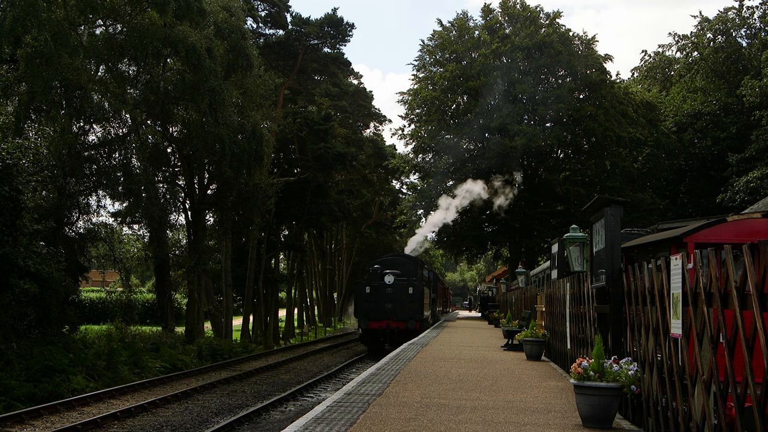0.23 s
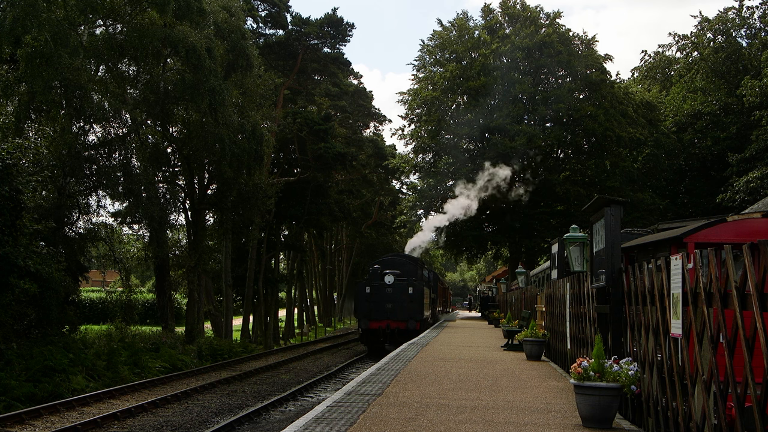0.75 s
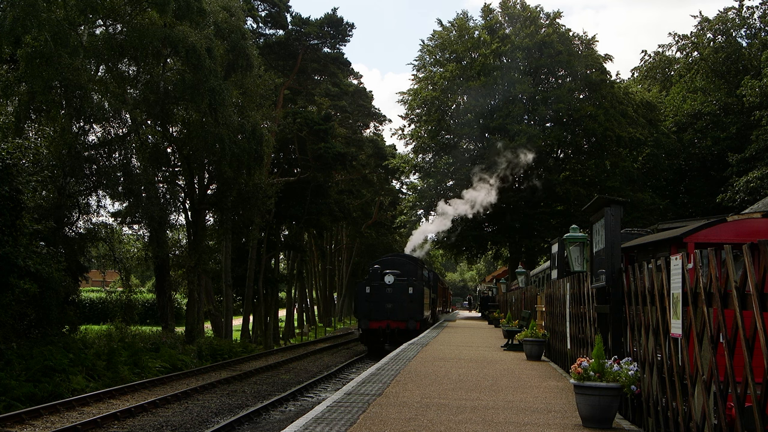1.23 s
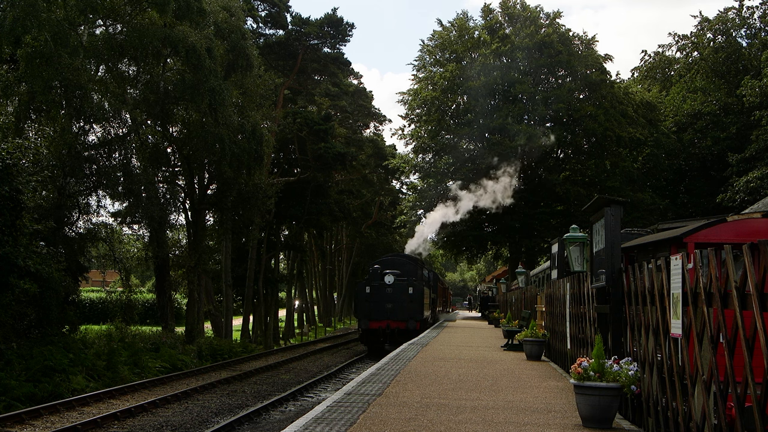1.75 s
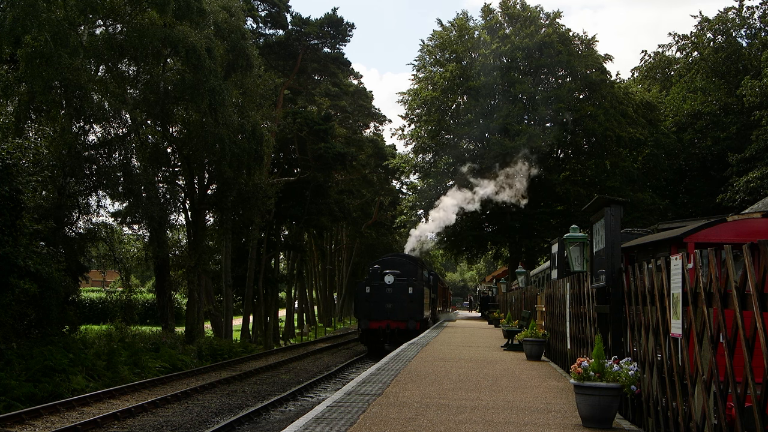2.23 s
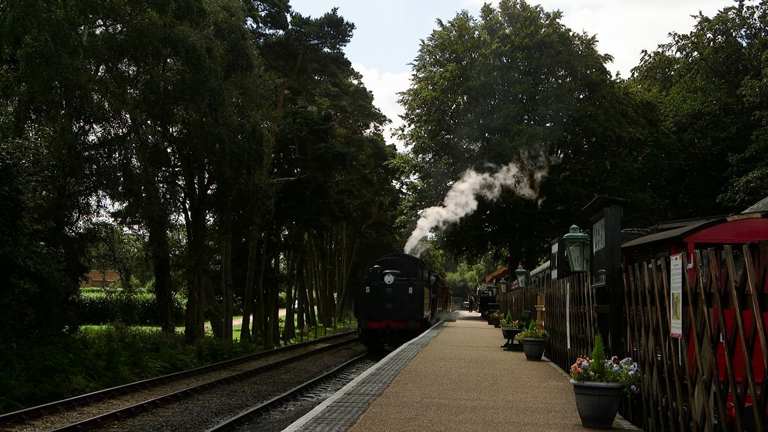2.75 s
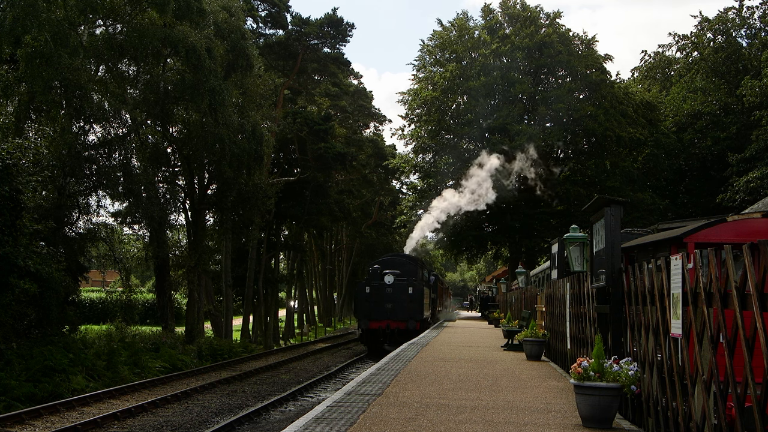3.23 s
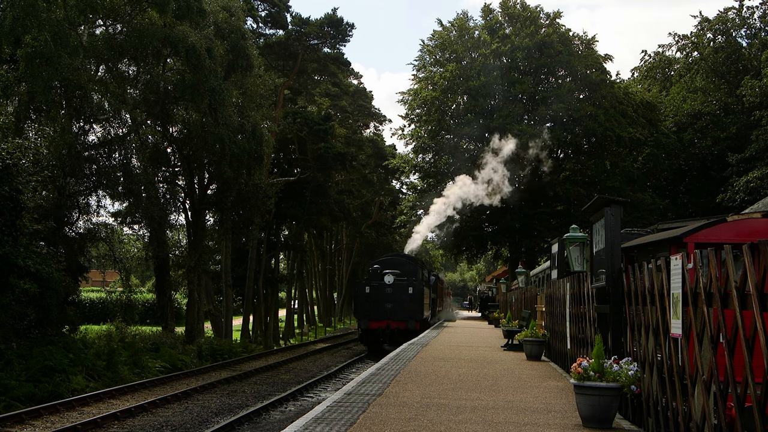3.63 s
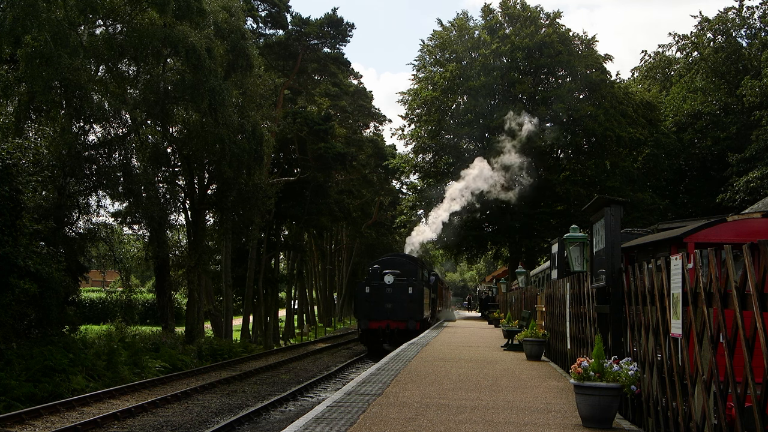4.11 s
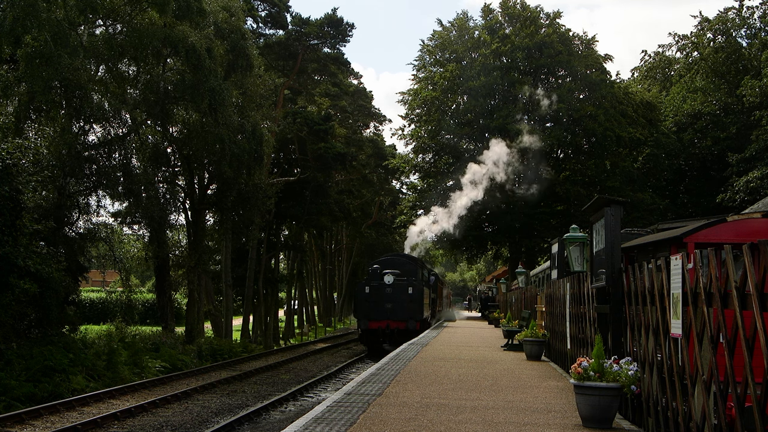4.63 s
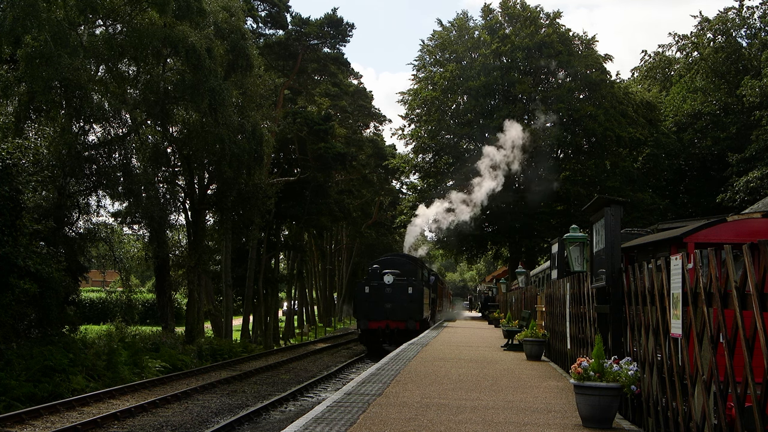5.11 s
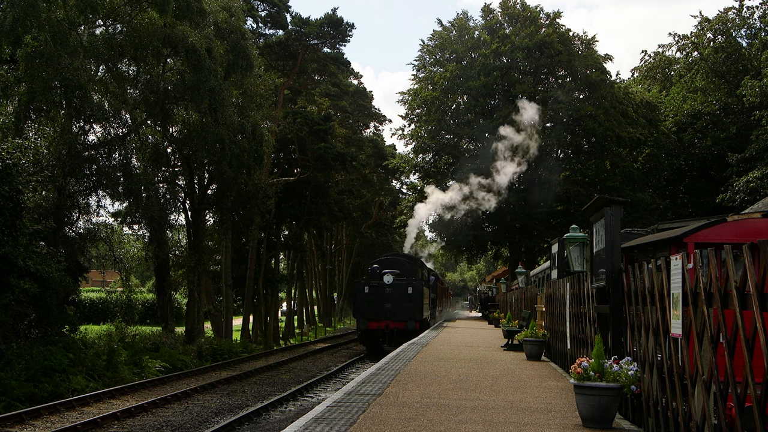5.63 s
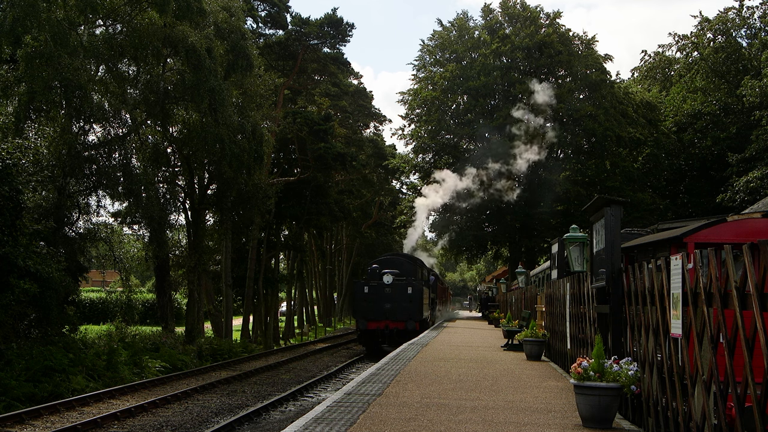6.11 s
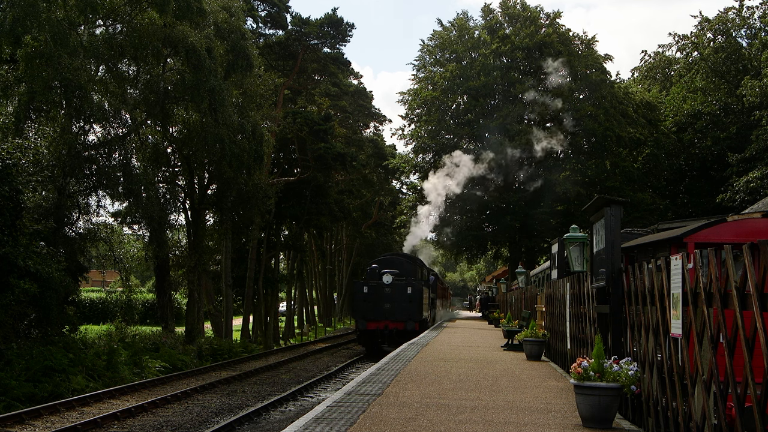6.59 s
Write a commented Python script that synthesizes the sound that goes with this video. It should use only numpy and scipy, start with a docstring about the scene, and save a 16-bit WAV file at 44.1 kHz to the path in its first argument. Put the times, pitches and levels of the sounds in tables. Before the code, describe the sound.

A standing steam locomotive blows off steam in a loud, steady roaring hiss that suddenly cuts off, leaving a faint simmer and open-air quiet.

```python
"""A country platform among trees, with a steam locomotive some way off, its safety valve blowing.
The jet is noise roaring through the valve's resonances; it builds, surges, sinks and is cut off at the seat.
Trees and a fence scatter the sound as decaying noise echoes, so the roar dies away gradually.
What stays is the chimney's throbbing drone, the rush of the fire and a thin leak of steam ringing a pipe.
Near the end come a brief sizzle in the leak and a few faint, wavering tones from far off."""
import sys
import numpy as np
from scipy import signal
from scipy.fft import rfft, irfft
from scipy.io import wavfile
from scipy.ndimage import uniform_filter1d, map_coordinates

SR = 44100
rng = np.random.default_rng(int(sys.argv[2]) if len(sys.argv) > 2 else 0)


def bounce(signal):
    """Save signal as a 16-bit WAV file at the path given by the first command-line argument."""
    frames = np.transpose(np.atleast_2d(signal))
    limited = np.clip(frames, -1, 1)
    pcm = np.round(limited * 32767).astype(np.int16)
    wavfile.write(sys.argv[1], SR, pcm)


N = 302558

# faint short tones from far off: (time [s], pitch [Hz], length [s], level [dB])
FAR_TONE_EVENTS = [(5.93, 798, .13, -59), (6.368, 905, 0.041, -55), (6.73, 546, .18, -57),
                   (6.773, 410, 0.092, -57)]
# colour of the fire's rush: (frequency [Hz], relative density [dB per Hz])
FIRE_COLOUR = [(25, -20), (50, 0.5), (110, -4.5), (160, -11), (240, -0.5), (350, -3), (500, -1.5),
               (700, -1), (850, 3), (1300, -1.5), (2000, -10), (5000, -36)]
# resonances of the smokebox: (frequency [Hz], width [Hz], lift [dB])
SMOKEBOX_MODES = [(294.5, 15.2, 12), (414, 25, 9), (503, 20, 4.5), (615, 30, 5), (937, 60, 3),
                  (1362, 54, 6)]
# resonances of the chimney's drone: (frequency [Hz], width [Hz], relative level [dB])
CHIMNEY_MODES = [(185.5, 16.5, 6), (209, 44, 0), (250, 30, -8.5)]
# colour of the steam leak: (frequency [Hz], relative density [dB per Hz])
LEAK_HISS_COLOUR = [(300, -22), (1000, -3.5), (2000, 0.5), (3200, -1.5), (4500, 0.5), (6000, 1.14),
                    (7200, -1.6), (8400, -4.5), (9500, -5.5), (11000, -11), (13000, -11), (15700, -21)]
# resonances of the leaking pipe: (frequency [Hz], width [Hz], lift [dB])
PIPE_MODES = [(1600, 85, 5.5), (2015, 110, 4), (3780, 130, 4.5), (4240, 176, 6), (4780, 140, 4),
              (5270, 140, 2)]
# the leak's treble flares once, softly: (time [s], length [s], corner [Hz], level [dB])
LEAK_FLARE = (6.12, 0.5, 8000, -61.5)
# colour of the jet: (frequency [Hz], relative density [dB per Hz])
JET_COLOUR = [(25, -50), (50, -23.5), (100, -14), (170, -7.5), (300, -6), (700, -5), (1100, -0.5),
              (2100, 1), (4300, -0.0857), (6600, -2), (8500, -7.5), (10000, -8), (13000, -15), (15700, -22)]
# resonances of the valve casing and the boiler top: (frequency [Hz], width [Hz], lift [dB])
CASING_MODES = [(129, 9.7, 3.5), (223, 9.7, 2), (287.2, 16.94, 9.5), (332.9, 18, 7), (457, 16.3, 8),
                (513.5, 24.2, 5), (659.4, 16, 5.5), (774, 8.6, 4.5), (908, 16.5, 8.5), (988, 16.4, 6.5),
                (1140, 5.7, 6), (1922.5, 41, 4.5), (2184, 37.4, 3), (2576, 17, 4), (4307, 380, 1.5),
                (7250, 46, 0.5), (12920, 800, 2.24)]
# faint singing of the valve lip, sinking and then rising: (time [s], pitch [Hz], lift [dB])
LIP_SONG = [(0, 10150, 1), (.45, 9680, 3), (1.25, 9540, 4.5), (2, 9400, 1.5), (3.7, 9520, 0),
            (4.15, 10050, 3), (4.6, 10150, 1)]
# rumble and sizzle that a surge brings out: (frequency [Hz], width [Hz], lift [dB])
SURGE_LIFTS = [(115, 83, 4.5), (6040, 3000, 1.38)]
# how much left-right difference the microphone pair keeps: (frequency [Hz], gain [dB])
STEREO_WIDTH = [(60, -7), (150, -24.5), (400, -4.5), (1500, -8.5), (3000, -2.5), (6500, 0), (10000, -4),
                (13000, 2.5)]
# lean of the microphone pair: (frequency [Hz], left minus right [dB])
STEREO_LEAN = [(150, 0.26), (400, 0.7), (1700, 0), (2400, 0.75), (5000, 0.42), (6200, 2), (10200, 0.05),
               (13400, 4), (15500, 1.6)]

# steady levels of the leak, the fire and the chimney's drone
LEAK_DB, FIRE_DB, DRONE_DB = -49, -54, -54.5
# the drone throbs unevenly: random strengths a second, their spread
THROB_HZ, THROB_DB = 10, 1.6
# the jet's level once built up, how far below it begins, and the time constant of the build
JET_DB, BUILD_DB, BUILD_S = -21.0, 1.43, 2.17
# the jet surges shortly before the valve closes: start and rise time
SURGE_S, SURGE_RISE_S = 3.66, 0.47
# the valve starts to sink and throttles the jet
SINK_S, SINK_DB_PER_S = 4.332, 18.5
# then it drops onto its seat; the roar dies, faster with each kHz
SEAT_S, SEAT_DB_PER_S, SEAT_DB_PER_S_PER_KHZ = 4.611, 71, 3.5
# the jet stands a touch to the left: left minus right
JET_PAN_DB = 0.63
# steep upper limit of the microphones
TOP_HZ = 15800


def undb(db):
    """Decibels to gain."""
    return 10 ** (np.asarray(db) / 20)


def level(x, db):
    """Scale to an rms level."""
    return x * undb(db) / np.sqrt(np.mean(x ** 2))


def curve(table, t):
    """Every column of a time table at the times t."""
    s, *columns = np.transpose(table)
    return [np.interp(t, s, column) for column in columns]


def colour(points, hz):
    """A spectrum in dB, joined on a log-frequency axis."""
    f, db = np.transpose(points)
    return np.interp(np.log(hz + 1), np.log(f), db)


def bell(hz, centre, width):
    """Resonance curve: 1 at the centre, one half at the edges of its width."""
    return 1 / (1 + (2 * (hz - centre) / width) ** 2)


def widen(modes):
    """Stage widths that give a double resonance its half-power width."""
    return [(f, width / np.sqrt(np.sqrt(2) - 1), db) for f, width, db in modes]


def ringing(modes, hz):
    """The dB that a set of double resonances adds to the noise passing through them."""
    added_power = 0
    for f, width, lift_db in widen(modes):
        peak = undb(abs(lift_db)) ** 2 - 1
        added_power = added_power + peak * bell(hz, f, width) ** 2
    return 10 * np.log10(1 + added_power)


def noise(db):
    """Noise of rms 1 with the given dB for each frequency."""
    spectrum = rfft(rng.standard_normal(N))
    return level(irfft(spectrum * undb(db), N), 0)


def eddies(shape, bins, frames):
    """Smooth random field over frequency and time, spread 1."""
    field = rng.standard_normal(shape)
    for axis, span in enumerate((bins, frames)):
        for _ in range(2):
            field = uniform_filter1d(field, span, axis=axis, mode="wrap")
    return field / field.std()


def throb(t, rate_hz):
    """Uneven swells through rate_hz random strengths a second, rms 1."""
    swells = rng.standard_normal(400)
    return level(map_coordinates(swells, [t * rate_hz], mode="mirror"), 0)


def trees(x, t60_s=1.896, treble_loss_hz=6500, wet_db=-14):
    """Trunks and station walls scatter the sound back; leaves swallow the treble first."""
    f, s, cells = signal.stft(rng.standard_normal(SR * 2), SR, nperseg=256)
    # t60_s holds in the bass; the decay is twice as fast at treble_loss_hz
    fade_db = -60 * s / t60_s * (1 + (f[:, None] / treble_loss_hz) ** 2)
    echo = signal.istft(cells * undb(fade_db), SR)[1]
    echo = echo / np.sqrt(np.sum(echo ** 2))
    return signal.fftconvolve(x, echo)[:N] * undb(wet_db)


def fence(x, decay_s=0.042, slat_hz=3500, wet_db=-16):
    """The slats of the fence alongside throw back a quick spray of treble."""
    t = np.arange(SR // 10) / SR
    echo = rng.standard_normal(len(t)) * np.exp(-t / decay_s)
    echo = signal.sosfilt(signal.butter(1, slat_hz, "high", fs=SR, output="sos"), echo)
    echo = echo / np.sqrt(np.sum(echo ** 2))
    return signal.fftconvolve(x, echo)[:N] * undb(wet_db)


def far_tones(t, waver_hz=5):
    """Soft, slightly wavering sine tones that swell and fade."""
    out = 0
    for s, hz, length, db in FAR_TONE_EVENTS:
        pitch = hz + waver_hz * eddies((1, N), 1, 900)[0]
        tone = np.sin(2 * np.pi * np.cumsum(pitch) / SR)
        swell = np.exp(-(2 * (t - s) / length) ** 2)
        out = out + level(tone, db) * swell
    return out


def draught(t, hz):
    """The fire rushes steadily in the smokebox while the chimney drones in uneven surges."""
    rush = noise(colour(FIRE_COLOUR, hz) + ringing(SMOKEBOX_MODES, hz))
    chimney_power = sum(undb(db) ** 2 * bell(hz, f, width) ** 2 for f, width, db in widen(CHIMNEY_MODES))
    drone = noise(10 * np.log10(chimney_power))
    # flatten the noise's own slow swells, so that the throb sets the strength
    drone = drone / np.sqrt(uniform_filter1d(drone ** 2, size=6000))
    drone_db = DRONE_DB + THROB_DB * throb(t, THROB_HZ)
    return rush * undb(FIRE_DB) + drone * undb(drone_db)


def leak(t, hz):
    """A thin, steady hiss of steam that rings a small pipe; for a moment it sizzles a little brighter."""
    hiss_db = colour(LEAK_HISS_COLOUR, hz) + ringing(PIPE_MODES, hz)
    s, length, corner_hz, flare_db = LEAK_FLARE
    bass_cut_db = 10 * np.log10(1 + (corner_hz / (hz + 1)) ** 8)
    sizzle = noise(hiss_db - bass_cut_db)
    swell = np.exp(-(2 * (t - s) / length) ** 2)
    return noise(hiss_db) * undb(LEAK_DB) + sizzle * undb(flare_db) * swell


def valve_travel(t):
    """Seconds that the valve has spent sinking, and seconds since it dropped onto its seat."""
    sinking = np.maximum(np.minimum(t, SEAT_S) - SINK_S, 0)
    seated = np.maximum(t - SEAT_S, 0)
    return sinking, seated


def safety_valve(hz, thinning_db_per_s=1.0, middle_hz=2000, lip_width_hz=240, wander_db=1.11, flutter_db=0.37):
    """Turbulent jet through the casing; it builds, surges, thins as the valve sinks and dies treble first."""
    roar = noise(colour(JET_COLOUR, hz) + ringing(CASING_MODES, hz))
    f, s, cells = signal.stft(roar, SR, nperseg=2048)
    f = f[:, None]
    db = JET_DB - BUILD_DB * np.exp(-s / BUILD_S)
    lip_hz, lip_db = curve(LIP_SONG, s)
    db = db + lip_db * bell(f, lip_hz, lip_width_hz)
    surge = np.clip((s - SURGE_S) / SURGE_RISE_S, 0, 1)
    db = db + surge * sum(lift_db * bell(f, centre, width) for centre, width, lift_db in SURGE_LIFTS)
    # a narrowing gap loses its rumble and its sizzle before the middle of its range
    sinking, seated = valve_travel(s)
    octaves = np.log2((f + 400) / middle_hz)
    db = db - sinking * (SINK_DB_PER_S + thinning_db_per_s * octaves ** 2)
    khz = f / 1000
    db = db - seated * (SEAT_DB_PER_S + SEAT_DB_PER_S_PER_KHZ * khz)
    # paths through the hot plume interfere: narrow bands wander slowly, broad ones flutter
    db = db + wander_db * eddies(cells.shape, 3, 12)
    db = db + flutter_db * eddies(cells.shape, 100, 3)
    return signal.istft(cells * undb(db), SR)[1][:N]


def scene(leak_scatter_db=3.0):
    """The engine lies almost straight ahead; the scatter from trees and fence differs from ear to ear."""
    t = np.arange(N) / SR
    hz = np.arange(N // 2 + 1) * SR / N
    jet = safety_valve(hz)
    simmer = leak(t, hz) + draught(t, hz)
    pan = undb(np.array([[1], [-1]]) * JET_PAN_DB / 2)
    # the simmering sits low and half hidden, so more of it arrives by reflection
    scattered = jet + simmer * undb(leak_scatter_db)
    reflections = np.array([trees(scattered) + fence(scattered) for ear in range(2)])
    return jet * pan + simmer + far_tones(t) + reflections


def record(dry):
    """Two close microphone ports hear much the same bass; the left is brighter; the top is cut steeply."""
    hz = np.arange(N // 2 + 1) * SR / N
    left, right = rfft(dry)
    sides = np.array([[1], [-1]])
    middle = (left + right) / 2
    difference = (left - right) / 2 * undb(colour(STEREO_WIDTH, hz))
    pair = middle + sides * difference
    lean = undb(sides * colour(STEREO_LEAN, hz) / 2)
    top = 1 / np.sqrt(1 + (hz / TOP_HZ) ** 600)
    return irfft(pair * lean * top, N)


dry = scene()
out = record(dry)
bounce(out)
```